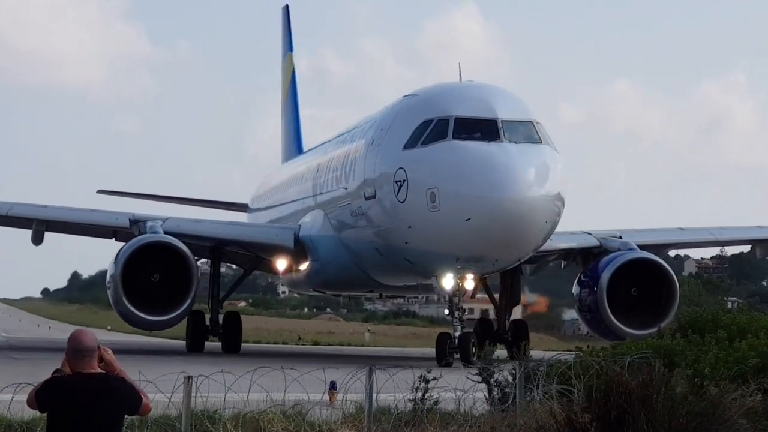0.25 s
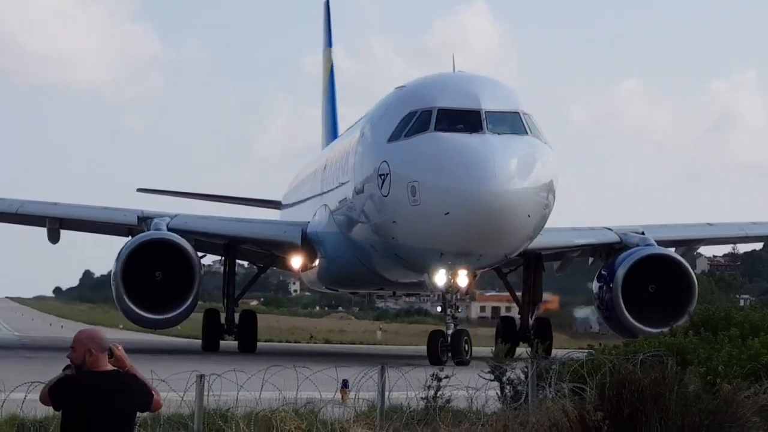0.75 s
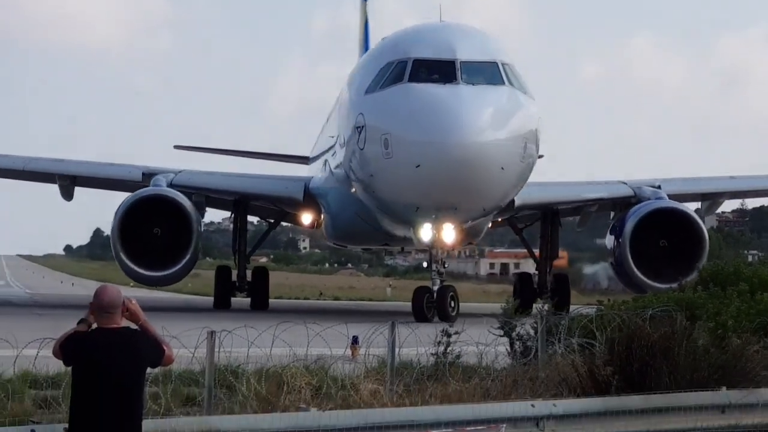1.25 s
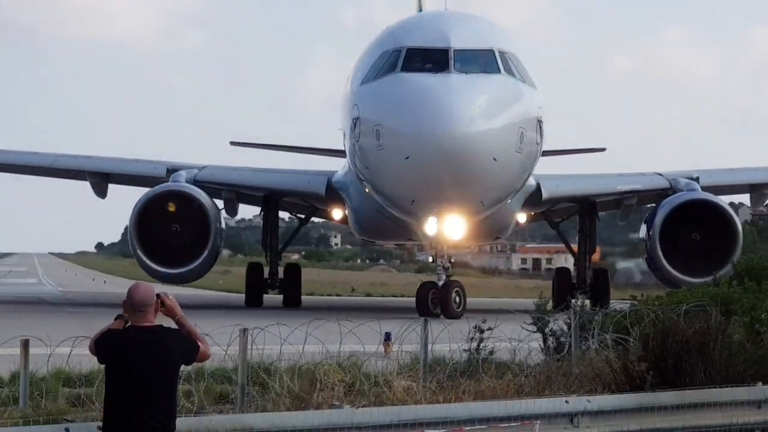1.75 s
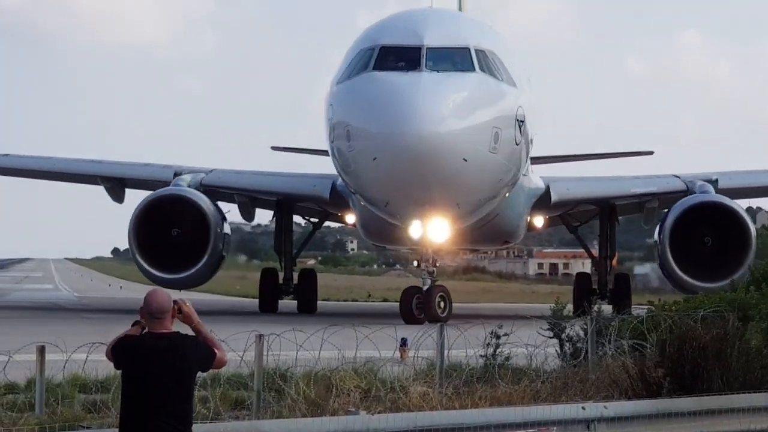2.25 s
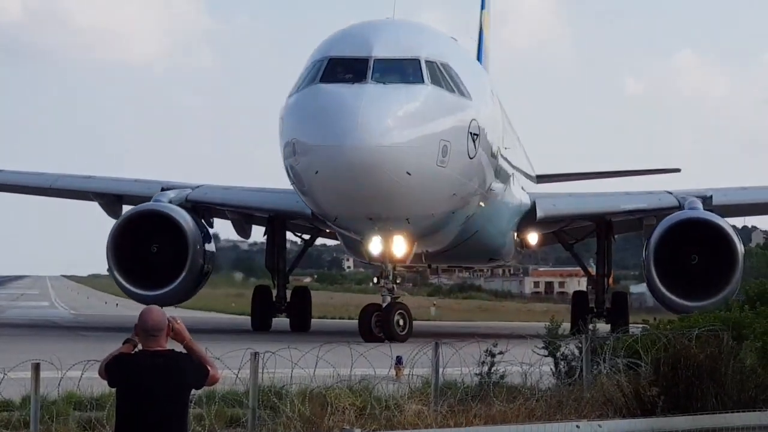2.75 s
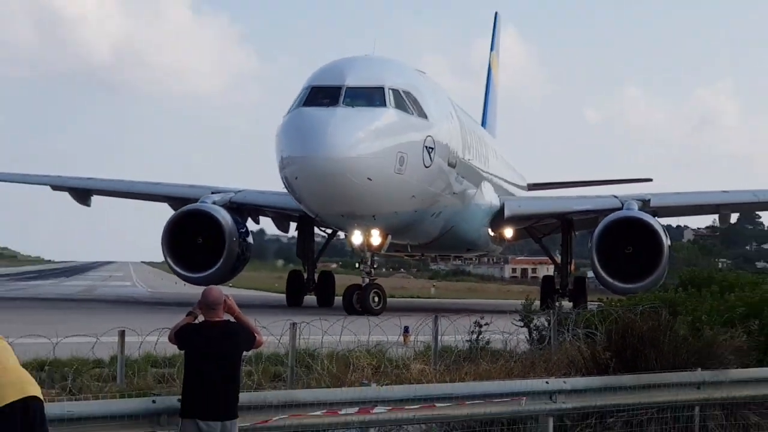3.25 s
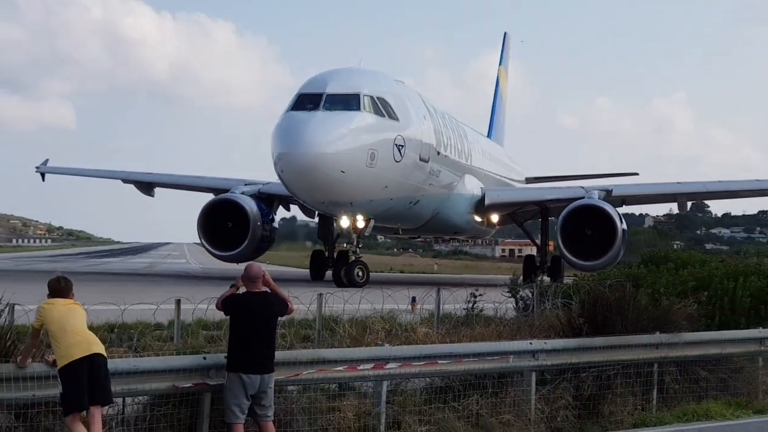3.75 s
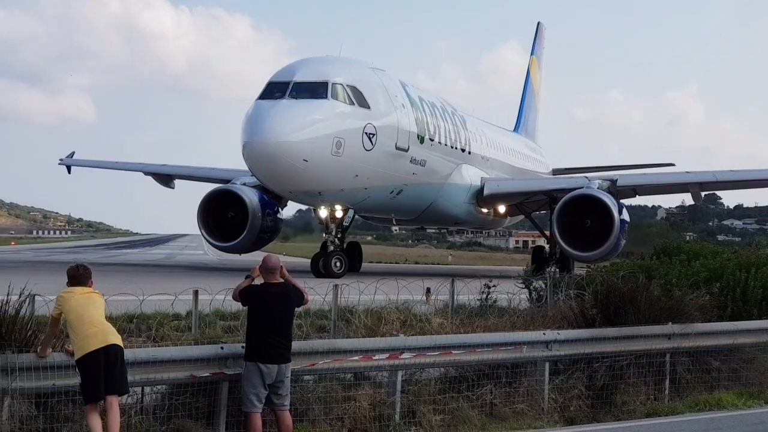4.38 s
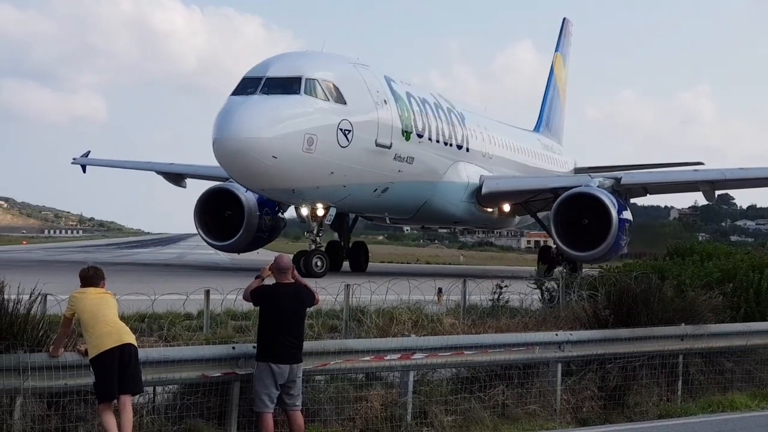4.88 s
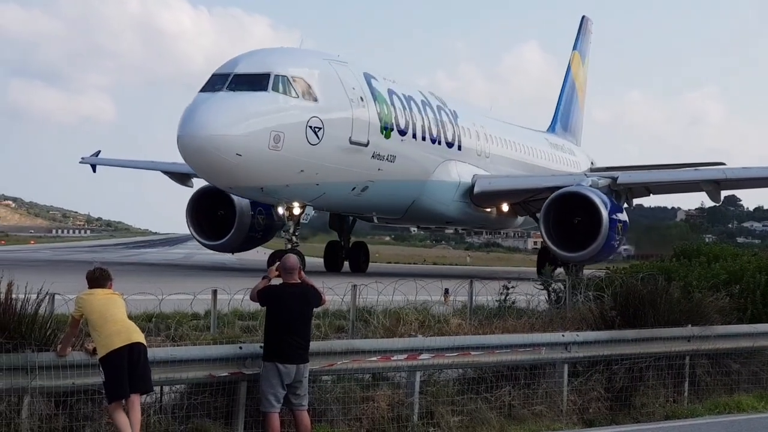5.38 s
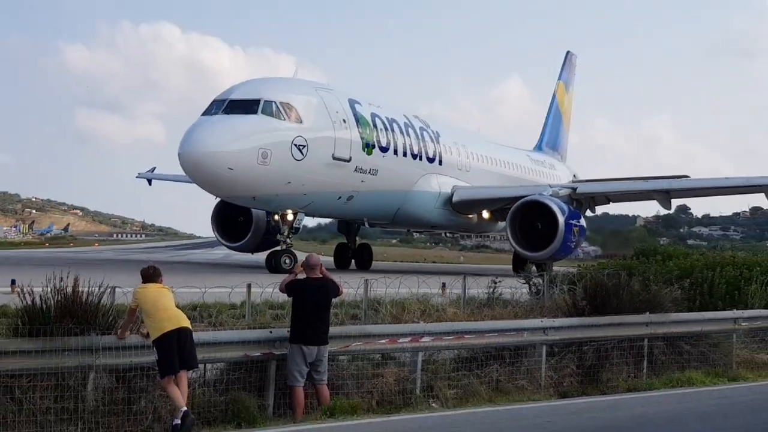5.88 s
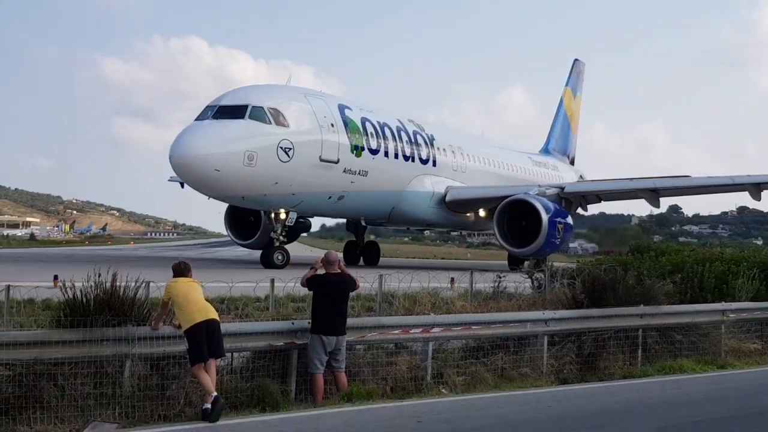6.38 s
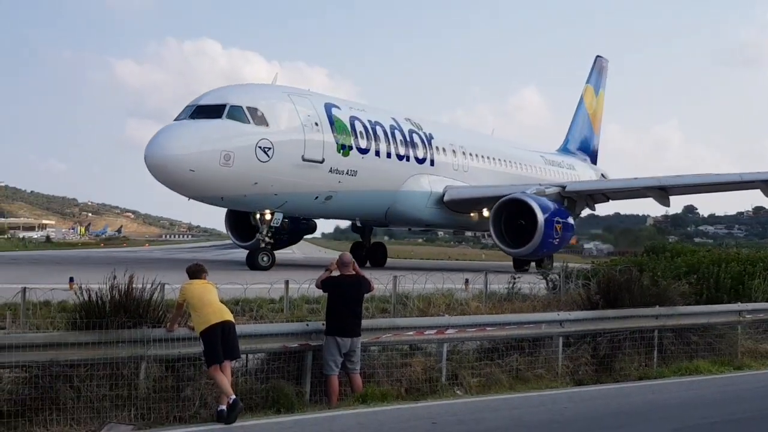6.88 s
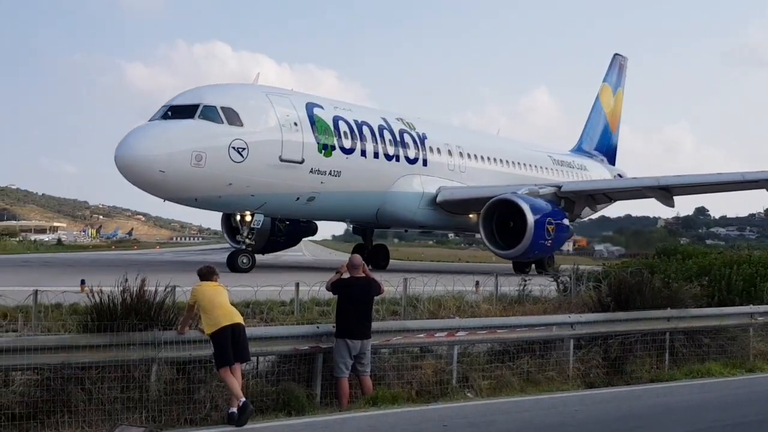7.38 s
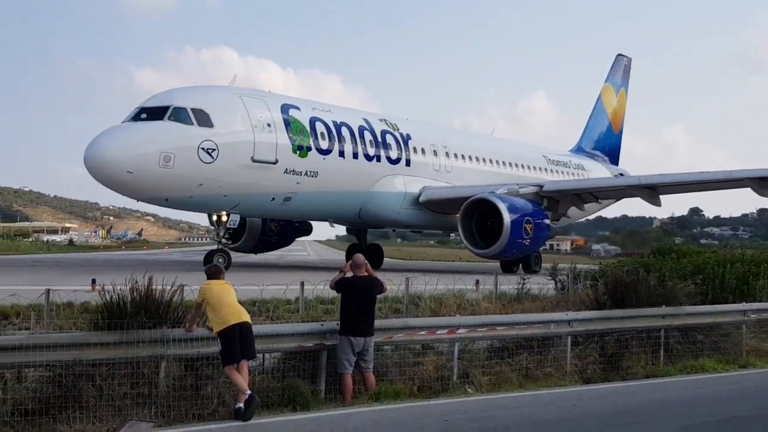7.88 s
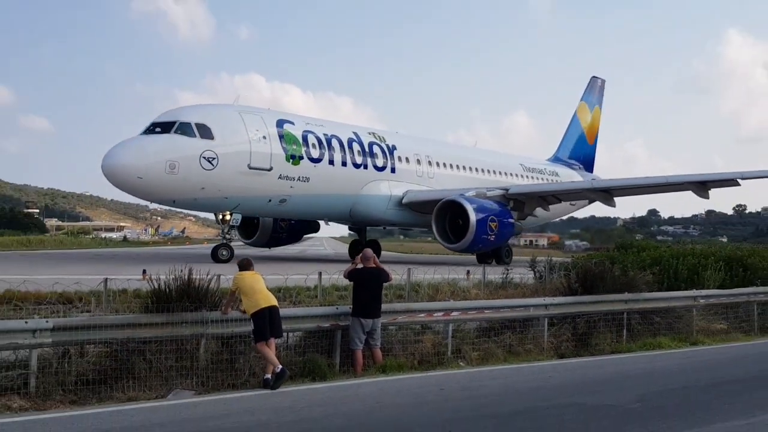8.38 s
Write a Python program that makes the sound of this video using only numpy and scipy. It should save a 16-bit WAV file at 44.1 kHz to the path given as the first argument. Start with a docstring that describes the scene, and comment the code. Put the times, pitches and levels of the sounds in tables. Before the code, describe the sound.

Outdoors near a runway fence, a twin-jet airliner taxis at low thrust: airy roar, breathy fan rush, low drone and thin high whine. At about half a second a hand bumps and cups the microphone, making a piercing, nasal blare with knocks and rubbing for a second. The engines then return quieter, swell from about three seconds and stay strong, with shifting fan tones as the plane turns.

```python
"""A twin-jet airliner taxis past at low thrust, turning from nose-on to side-on.
Rumble, roar, fan rush, hiss and fizz are shaped noise; the combustors drone on a wavering low note.
Blade whines and intake tones are sines with unsteady pitch, and lobes of fan noise sweep past.
Early on, a hand bumps the camera and cups its microphone for about a second: added bands of
noise and a lifted whine make the engines blare, over knocks and rubbing."""
import sys
import numpy as np
from scipy import signal
from scipy.fft import rfft, irfft, next_fast_len
from scipy.io import wavfile
from scipy.ndimage import uniform_filter1d, minimum_filter1d, map_coordinates

SR = 44100
rng = np.random.default_rng(int(sys.argv[2]) if len(sys.argv) > 2 else 0)


def int16_out(signal):
    """Quantize to a 16-bit WAV file."""
    q = np.round(np.clip(np.atleast_2d(signal).T, -1, 1) * 32767)
    wavfile.write(sys.argv[1], SR, q.astype(np.int16))


N = 380583  # length in samples

# How far the engines have turned. Each row: time in seconds, turn from 0 (nose-on) to 1 (side-on).
TURN = [(0, 0.053), (3.5, 0.068), (4.6, 0.42), (7, 0.46), (7.7, 0.92), (8.6, 0.94)]
# How strongly the engines carry to the camera. Each row: time in seconds, loudness in dB.
PRESENCE = [(0, -4.5), (0.35, -8), (1.5, -7), (2.25, -8.5), (2.65, -6), (3, -3.5), (3.5, -0.5), (4.4, 0),
            (4.95, 0.6), (6.2, 0), (6.8, -1), (8.63, -2)]
# How each engine layer follows the airliner. Each row: base level in dB, growth in dB per dB of
# presence, change when side-on in dB, change when nose-on in dB, change in the flare in dB.
LAYERS = { "rumble": (-30, 0.52, 3.5, -2, 0.5), "combustor": (-32, 1.15, -2.5, -1, -5),
          "roar": (-17, 1.33, 0.5, 1.5, 0), "fan": (-20.5, 0.3, -0.5, -4, 1),
          "hiss": (-27.5, 1.77, 1, 2, 5), "fizz": (-39.5, 2, -2, 0.5, 8),
          "whine": (-39.5, 1, -8.5, -4.5, 9), "intake tone": (-54, 8, -1, 2, 0), }
NOSE_ON_S, NOSE_ON_WIDTH_S = 2.47, 0.5  # the intakes point straight ahead, where the fans radiate least
FLARE_S, FLARE_WIDTH_S = 8.29, 0.17  # the treble flares once as the near intake swings past

# The colours of the noises. Each row: pitch in Hz, relative level in dB per Hz.
# low engine rumble
RUMBLE = [(15, -31), (30, -16), (45, -16.5), (75, -8), (115, -4.5), (170, 2), (250, -1), (350, -5.5),
          (450, -11), (700, -13.5)]
# exhaust roar
ROAR = [(280, -47), (420, -5.5), (520, -0.5), (750, 1), (1050, 2), (1500, 0), (1750, 0.5), (2400, -11.5)]
# fan rush from the front
FAN_FRONT = [(1300, -30), (1750, -2.5), (2050, -3), (2330, 2), (2550, -4), (2780, -3.5), (3000, -9),
             (3400, -17), (4500, -116)]
# fan rush from between front and side
FAN_QUARTER = [(1300, -23), (1750, -1.5), (2000, 4), (2330, 1), (2600, 3), (2950, 5.5), (3200, 0.5),
               (3500, -5), (4500, -52)]
# fan rush from the side
FAN_SIDE = [(1300, -23), (1750, 4), (1950, 3.5), (2330, -2.5), (2600, -6), (3100, 2.5), (3500, -44),
            (4500, -66)]
# engine hiss from the front
HISS_FRONT = [(2500, -35), (3300, 5.5), (3800, 6.5), (4200, 0.5), (4600, 1), (5500, -8), (7000, -10.5),
              (8000, -47.5)]
# engine hiss from the side
HISS_SIDE = [(2500, -28), (3300, 4.5), (3800, 8.5), (4200, 3), (4750, -2.5), (5350, 1.5), (5800, -8),
             (7000, -10), (8000, -52)]
# the highest engine noise
FIZZ = [(7000, -49), (8200, -32), (9200, -2.5), (10200, -12), (11500, 8.5), (12300, 8.5), (13200, 5.5),
        (14500, -2.5)]
# engine noise gathered in the closed hand
CUPPED = [(40, -45), (200, -32), (500, -21), (750, -10), (1000, -8), (1600, -6.5), (1940, -1.5), (2050, 4),
          (2200, 1), (2380, 2), (2550, -8), (2730, 2.5), (2980, -17), (3650, -11), (4250, -18), (5200, -52),
          (6300, -39), (8000, -71)]
# engine noise gathered in the half-open hand
HALF_OPEN = [(40, -50), (400, -27), (950, -13.5), (1650, -15.5), (2050, -3.5), (2340, 4), (2540, -9),
             (2720, -1), (3020, -16.5), (3250, -5.5), (3450, -22), (3700, -12.5), (4300, -25.5),
             (5200, -25), (7000, -63)]
# treble gathered in the hand
SIZZLE = [(3000, -15), (5000, 2), (6500, -1), (7500, -2), (8700, -18.5), (10200, -14), (12000, -4),
          (14500, -31)]
# bright roar funnelled by the opening hand
SURGE = [(1800, -18), (3200, 6), (4400, 1.5), (5300, 3), (6200, 0), (7200, -24), (9000, -46)]
# fingers rubbing on the camera shell
RUB = [(25, -24), (90, -8), (300, 1.5), (450, -2.5), (900, -8.5)]
# Fixed peaks and interference dips that colour all the shaped noise.
# Each row: pitch in Hz, width in Hz, lift in dB.
RESONANCES = [(612, 50, 4), (762, 28, -4.5), (985, 95, 6), (1255, 40, -2), (1450, 85, 5), (1660, 45, -5),
              (1900, 50, 2), (2325, 90, 3), (2485, 30, -2.5), (2770, 45, -2)]

# How alike left and right are in most of the engine noise. Each row: pitch in Hz, likeness (1 = same).
ALIKE = [(30, 0.55), (160, 1), (330, 0.81), (550, 1), (1000, 0.91), (1450, 0.84), (1680, 0.13), (1900, 0.5),
         (2300, 0.78), (3000, 0.37), (4500, 0.59), (7000, 0.11), (12000, 0.62)]
# The same for the fizz. Each row: pitch in Hz, likeness.
FIZZ_ALIKE = [(8000, .35), (13000, .45)]
# The same for noise in the hand. Each row: pitch in Hz, likeness.
HAND_ALIKE = [(200, 1), (1000, 1), (2400, 0.88), (3200, 0.5), (6000, 0.33), (12000, .45)]
# Balance of the microphone pair. Each row: pitch in Hz, left minus right in dB.
BALANCE_DB = [(600, -1.5), (1300, -0.5), (1600, -2), (2400, -5), (2900, 0.5), (4500, 2), (7000, 10.5),
              (12000, 4.5)]
# Phase difference of the microphone pair. Each row: pitch in Hz, radians by which left leads.
LEAD = [(150, 0), (750, 0.53), (950, 0.066), (1250, 0.84), (1800, 0), (2400, 0.7), (3200, 1.8), (4200, 0),
        (7000, 0.25)]
# The engine noise drifts from left toward the middle. Each row: time in seconds, left minus right in dB.
PAN = [(0, 7.5), (2.2, 2.5), (2.8, 2.5), (4.3, 1.5), (5.8, 0.5)]

DRONE_HZ, DRONE_WIDTH_HZ = 152, 15
DRONE_STEADY_DB, DRONE_OCTAVE_DB = -6, -17  # the steady core, and the octave, against the wavering note
DRONE_LULL_S, DRONE_LULL_WIDTH_S, DRONE_LULL_DB = 5.5, .4, -3  # the drone sinks as the airliner turns
# The roar's low end sinks and recovers as the airliner turns. Each row: time in seconds, change in dB.
LOW_ROAR = [(3.8, 0), (4.7, 0.5), (5.4, -2.5), (6.1, -5.5), (6.7, -2), (7.3, 0), (8.3, 3.5)]
LOW_ROAR_HZ, LOW_ROAR_WIDTH_HZ = 550, 99
PATCHY_DB, PATCH_HZ, PATCH_S = 1.45, 253.6, .12  # moving air lifts and sinks patches of the noise
# A reflection cuts evenly spaced notches, deepest while nose-on.
# Each row: time in seconds, spacing in Hz, strength in dB.
NOTCHES = [(0.3, 382, 4), (1.2, 393, 2), (2.2, 415, 2.5), (3.6, 425, 0), (8.6, 410, -0.4)]
NOTCHES_FROM_HZ, NOTCHES_TO_HZ = 950, 1750
DIP_S, DIP_WIDTH_S, DIP_DB = 6.78, 0.015, -4  # the airliner's sound dips briefly

# Compressor whines, one list for each engine, drifting apart as the airliner turns.
# Each row: time in seconds, pitch in Hz.
COMPRESSOR_HZ = ( [(0, 5788), (1.6, 5781), (3, 5786), (4.5, 5783), (6, 5779), (7.5, 5773), (8.6, 5774)],
                 [(0, 5767), (1, 5762), (2.2, 5758), (3.3, 5763), (4.6, 5759), (5.6, 5750), (8.6, 5730)], )
# The far engine's whine is hidden by the fuselage. Each row: time in seconds, share of power from 0 to 1.
FAR_SHARE = [(0, 0.4), (0.65, 0.97), (0.85, 0.6), (1.6, 0.43), (4.7, 0.16), (5.3, 0.04), (8.6, 0.5)]
# The whine swells or sinks as its lobes cross the camera.
# Each row: time in seconds, width in seconds, lift in dB.
WHINE_SWELLS = [(0.545, .035, 9), (3.25, .2, -4), (3.85, .25, 2.5), (5.2, .3, 3), (5.7, .07, -4),
                (7.2, .45, -2.5)]
WHINE_PAN_DB = 6  # left minus right, in the open air
# Intake tones, one list for each engine, sinking as the thrust is eased.
# Each row: time in seconds, pitch in Hz.
INTAKE_HZ = ( [(0, 4560), (2.6, 4535), (3.9, 4490), (5.1, 4435), (6.1, 4400), (8.6, 4375)], [(0.6, 4660),
             (1.6, 4620), (3.2, 4620), (4, 4590), (5.1, 4558), (8.6, 4460)], )
# Each intake tone beams past the camera once. Each row: start in seconds, attack in seconds,
# hold in seconds, release in dB per second, level in dB, left minus right in dB.
INTAKE_BEAMS = [(2.45, 0.5, 0.32, 16, -34.3, 13), (2.41, .05, 2.7, 5, -42.5, 2)]

GRIP_S, GRIP_ATTACK_S = 0.584, 0.043  # the hand closes fast
SLACK_S, SLACK_WIDTH_S = 1.1, 0.076  # the grip slackens for a moment
OPEN_S, OPEN_TAKES_S = 1.17, 0.28  # the hand opens gradually
# What the hollow of the hand gathers. Each row: base level in dB, extra at the first grip in dB,
# seconds in which that eases, change when slack in dB, change when open in dB,
# hold in seconds, release in dB per second.
GATHERED = { "blare": (-12.5, 2.5, 0.64, -1, -1, 0.9344, 25.5),
            "sizzle": (-27.5, -0.5, 0.7, -2.5, -6.5, 0.71, 64),
            "whine": (-33, 13, 0.38, -4.5, 2.5, 0.92, 65), "intake tone": (-46.5, 1, 2, -1, -3.5, 4, 23), }
SURGE_S, SURGE_WIDTH_S, SURGE_DB = 1.426, 0.12, -23  # the opening hand briefly funnels a bright roar
HONK_S, HONK_WIDTH_S, HONK_DB = 1.6, .07, 3.3  # the blare is lifted just as the hand lets go
# Bumps of the hand on the camera. Each row: time in seconds, knock peak in dB, pitch in Hz,
# left minus right in dB, rubbing in dB, seconds for the knock to fall by 60 dB.
BUMPS = [(0.594, -15, 235, -8.5, -28, .022), (0.732, -16, 290, -3, -26.5, .055),
         (0.847, -11.5, 365, -1, -37, .03), (0.9, -14, 390, 0.5, -23.5, .022)]
RUB_WIDTH_S = 0.013  # the fingers slide for about this long on either side of a bump

# The fan rush sputters as the intakes swing toward the camera. Each row: time in seconds, level in dB.
SPUTTERS = [(1.832, -22), (1.888, -18.5), (1.936, -15.5), (2.019, -22), (2.145, -23)]
SPUTTER_HZ, SPUTTER_WIDTH_HZ, SPUTTER_WIDTH_S = 2320, 500, .0022
# Lobes of fan noise sweep over the camera as the engines turn. Each row: start in seconds,
# attack in seconds, hold in seconds, release in dB per second (below 0 it grows), centre in Hz,
# glide in Hz per second, width in Hz, level in dB, left minus right in dB.
FAN_LOBES = [ (2.3, 0.6, 1.6, 8, 2940, -60, 222, -38, -5), (2.6, 0.45, 0.6, 22, 2290, -9.5, 258.3, -27, -1),
             (3.6, 0.46, 0.91, 5, 4385, -19.5, 481, -33, 2), (4.3, .3, 0.49, 6, 1550, 0, 150.6, -27.5, -4),
             (4.3, 0.71, 0.15, 31, 2820, 30.5, 379, -23.5, 0),
             (4.95, 0.2, 1.0, 22, 2324, 0, 240.4, -25, -12),
             (5.2, 0.37, 1.5, 16, 2956, 45, 240.8, -32.5, -11),
             (5.3, .92, 0.97, 10, 5130, -13, 262.6, -42, -11),
             (6.6, 0.34, 0.45, 14, 2720, -110, 169.6, -30, -3),
             (6.7, 0.2, 0.6, -2, 1428, -10, 79.8, -31, 0),
             (7.33, 0.14, 0.05, 20, 2430, -380, 222, -27, -10),
             (7.45, 0.3, 0.31, 20, 1910, -10, 169.3, -26.5, -2), ]
# Clean tone of a turbine stage. Each row: start in seconds, attack in seconds, hold in seconds,
# release in dB per second, pitch in Hz, glide in Hz per second, level in dB, left minus right in dB.
STAGE_TONES = [(3.8, 0.35, .6, 1.5, 6480, -4, -45, 1)]
TOP_HZ = 14600  # nothing is kept at or above this pitch


def amp(db):
    """Turn decibels into gain."""
    return 10 ** (np.asarray(db) / 20)


def unit(x):
    """Scale so that the average of the channels has rms 1."""
    middle = np.atleast_2d(x).mean(0)
    return x / np.sqrt(np.mean(middle ** 2) + 1e-20)


def along(points, hz):
    """Read a value between (Hz, value) points on a log pitch axis."""
    point_hz, value = np.transpose(points)
    return np.interp(np.log(hz + 1), np.log(point_hz + 1), value)


def curves(rows):
    """Give one value per sample for each column after the time."""
    s, *columns = np.transpose(rows)
    return [np.interp(np.arange(N) / SR, s, column) for column in columns]


def swell(centre_s, width_s):
    """A bell-shaped rise and fall with top 1."""
    return np.exp(-.5 * ((np.arange(N) / SR - centre_s) / width_s) ** 2)


def ramp(start_s, length_s):
    """A straight rise from 0 to 1."""
    return np.clip((np.arange(N) / SR - start_s) / length_s, 0, 1)


def envelope(start_s, attack_s, hold_s, release_db_per_s):
    """Gain that rises, holds and then changes steadily in dB, usually dying away."""
    released_s = np.maximum(np.arange(N) / SR - start_s - attack_s - hold_s, 0)
    return ramp(start_s, attack_s) * amp(-release_db_per_s * released_s)


def wobble(rate):
    """A smooth random curve with this many random points a second."""
    points = rng.standard_normal(int(N * rate / SR) + 4)
    return map_coordinates(points, [np.arange(N) * rate / SR])


def fast_wobble(rate, count=8192, order=8):
    """A smooth random curve for rates up to several hundred points a second."""
    smooth = signal.resample_poly(rng.standard_normal(count), order, 1)
    return np.interp(np.arange(N) * order * rate / SR, np.arange(len(smooth)), smooth)


def panned(db):
    """Left and right gains for a level difference."""
    return amp(np.array([[.5], [-.5]]) * db)


def filtered(x, response):
    """Multiply the spectrum of x by a response that depends on pitch."""
    size = next_fast_len(N + 8192)
    spectrum = rfft(x, size) * response(np.fft.rfftfreq(size, 1 / SR))
    return irfft(spectrum, size)[..., :N]


def rush(spectrum, alike):
    """Stereo turbulence: random noise shaped by a spectrum and lifted or cut at the resonances."""
    def colour(hz):
        lift = sum(db * np.exp(-.5 * ((hz - centre) / width) ** 2) for centre, width, db in RESONANCES)
        skirt = 1 / (1 + (hz / spectrum[-1][0] / 1.3) ** 6)  # fades out above the last point
        angle = np.arccos(np.clip(along(alike, hz), -1, 1)) / 2  # wider angle, less alike
        return amp(along(spectrum, hz) + lift) * skirt * np.array([np.cos(angle), np.sin(angle)])
    mid, side = filtered(rng.standard_normal((2, N)), colour)
    return unit(np.array([mid + side, mid - side]))


def morph(spectra, position, alike):
    """Noise that passes through a row of spectra as position goes from 0 to 1."""
    place = np.clip(position, 0, 1) * (len(spectra) - 1)
    out = 0
    for k, spectrum in enumerate(spectra):
        share = np.clip(1 - np.abs(place - k), 0, 1)
        out = out + np.sqrt(share) * rush(spectrum, alike)
    return out


def noise_band(hz, width_hz, pan_db, apart):
    """A sine carrier broadened by random wobbles; apart says how unlike the two ports are."""
    carrier = np.exp(2j * np.pi * np.cumsum(hz) / SR)

    def band():
        return np.real(carrier * (fast_wobble(width_hz) + 1j * fast_wobble(width_hz)))
    mid, side = band(), band()
    return unit((mid + apart * np.array([side, -side])) * panned(pan_db))


def tone(hz, drift_hz, flutter_db, pan_db):
    """A tone blurred in pitch and fading at each port as it crosses turbulent air."""
    phase = 2 * np.pi * np.cumsum(hz + drift_hz * wobble(70)) / SR
    fading_db = flutter_db * (wobble(16) + 1.1 * np.array([wobble(11), wobble(17)]))
    scatter = 0.42 * np.array([wobble(12), wobble(13)])  # radians, separate for each port
    return unit(amp(fading_db) * np.sin(phase + scatter) * panned(pan_db))


def radiated(layer):
    """Gain of one engine layer: it follows presence and changes as the engines turn."""
    db, growth, side_db, nose_db, flare_db = LAYERS[layer]
    aim_db = side_db * curves(TURN)[0] + nose_db * swell(NOSE_ON_S, NOSE_ON_WIDTH_S)
    aim_db = aim_db + flare_db * swell(FLARE_S, FLARE_WIDTH_S)
    return amp(db + growth * curves(PRESENCE)[0] + aim_db)


def gathered(layer):
    """Gain of one layer in the hollow of the hand, changing as the grip tightens, slackens and opens."""
    db, grip_db, ease_s, slack_db, open_db, hold_s, release_db_per_s = GATHERED[layer]
    tight = np.exp(-np.maximum(np.arange(N) / SR - GRIP_S, 0) / ease_s)
    level_db = db + grip_db * tight + slack_db * swell(SLACK_S, SLACK_WIDTH_S)
    level_db = level_db + open_db * ramp(OPEN_S, OPEN_TAKES_S)
    return amp(level_db) * envelope(GRIP_S, GRIP_ATTACK_S, hold_s, release_db_per_s)


def drone():
    """The combustors boom on one narrow, wavering note with a steadier core and a faint octave."""
    pitch = np.full(N, DRONE_HZ)
    note = noise_band(pitch, DRONE_WIDTH_HZ, 0, apart=0.1)
    core = tone(pitch, drift_hz=1.49, flutter_db=1.5, pan_db=-2.0)
    octave = noise_band(2 * pitch, 2 * DRONE_WIDTH_HZ, 0, apart=.3)
    return note + amp(DRONE_STEADY_DB) * core + amp(DRONE_OCTAVE_DB) * octave


def patches(x):
    """Moving air gives patches of time and pitch their own gain; a reflection adds sliding notches."""
    hz, t, z = signal.stft(x, SR, nperseg=512)
    rows, columns = np.meshgrid(hz / PATCH_HZ, t / PATCH_S, indexing="ij")
    field = map_coordinates(rng.standard_normal((256, 256)), [rows, columns], order=1)
    notch_s, *notch_columns = np.transpose(NOTCHES)
    spacing_hz, strength_db = (np.interp(t, notch_s, column) for column in notch_columns)
    notched = ((hz > NOTCHES_FROM_HZ) & (hz < NOTCHES_TO_HZ))[:, None]
    notch_db = -strength_db * notched * (.5 + np.cos(2 * np.pi * hz[:, None] / spacing_hz))
    return signal.istft(z * amp(PATCHY_DB * field + notch_db), SR, nperseg=512)[1][:, :N]


def ports(x):
    """The camera body shades and delays the sound differently at its two ports."""
    def response(hz):
        lead = np.exp(np.array([[.5j], [-.5j]]) * along(LEAD, hz))
        return panned(along(BALANCE_DB, hz)) * lead
    return filtered(x, response)


def engines():
    """Rumble, combustor drone, roar, fan rush, hiss and fizz; moving air makes their levels shimmer."""
    turn, = curves(TURN)
    air = wobble(14)  # shared by all layers but the rumble and drone
    lull = amp(DRONE_LULL_DB * swell(DRONE_LULL_S, DRONE_LULL_WIDTH_S))
    burning = radiated("rumble") * rush(RUMBLE, ALIKE) + radiated("combustor") * lull * drone()
    burning = amp(0.9 * wobble(20)) * burning
    roar = radiated("roar") * amp(0.55 * air) * rush(ROAR, ALIKE)
    low_end = filtered(roar, lambda hz: np.exp(-.5 * ((hz - LOW_ROAR_HZ) / LOW_ROAR_WIDTH_HZ) ** 2))
    roar = roar + (amp(curves(LOW_ROAR)[0] + 0.42 * wobble(14)) - 1) * low_end
    # the intake's narrow peak beams forward; from the side the fan sounds broader and lower
    fan_gain = radiated("fan") * amp(.5 * air + 0.41 * wobble(8))
    fan = fan_gain * morph([FAN_FRONT, FAN_QUARTER, FAN_SIDE], turn, ALIKE)
    hiss_gain = radiated("hiss") * amp(0.35 * air + 0.81 * wobble(28))
    hiss = hiss_gain * morph([HISS_FRONT, HISS_SIDE], turn ** 2, ALIKE)
    fizz = radiated("fizz") * amp(0.44 * air + 1.5 * wobble(33)) * rush(FIZZ, FIZZ_ALIKE)
    # as the engines move aside, their treble reaches the right port later, by up to 6 samples
    left, right = hiss + fizz
    right = map_coordinates(right, [np.arange(N) - 6 * turn], order=5, mode="nearest")
    airborne = patches(roar + fan + np.array([left, right]))
    return ports(burning + airborne) * panned(curves(PAN)[0])


def whines():
    """The two compressors run at slightly different speeds and beat; the cupped hand lifts both."""
    share = np.clip(curves(FAR_SHARE)[0], 0, 1)
    near_hz, far_hz = (curves(pitch)[0] for pitch in COMPRESSOR_HZ)
    near = np.sqrt(1 - share) * tone(near_hz, drift_hz=2.2, flutter_db=2.1, pan_db=0)
    far = np.sqrt(share) * tone(far_hz, drift_hz=3.5, flutter_db=1.6, pan_db=0)
    lobes = amp(sum(db * swell(s, width_s) for s, width_s, db in WHINE_SWELLS))
    in_air = radiated("whine") * lobes * panned(WHINE_PAN_DB) * amp(1.4 * wobble(60))
    # a second, slightly later ramp delays the whine in the closing hand
    in_hand = gathered("whine") * ramp(GRIP_S + .018, .02) * amp(1.1 * wobble(90))
    return np.hypot(in_air, in_hand) * (near + far)


def intakes():
    """Each intake sings faintly, more in the cupped hand, and clearly while its beam crosses the camera."""
    faint = np.hypot(radiated("intake tone"), gathered("intake tone"))
    out = 0
    for pitch, (*shape, db, pan_db) in zip(INTAKE_HZ, INTAKE_BEAMS):
        beam = amp(db) * envelope(*shape)
        singing = tone(curves(pitch)[0], drift_hz=6, flutter_db=1.3, pan_db=pan_db)
        out = out + np.hypot(faint, beam) * singing
    return out


def cupped_hand():
    """The hollow of the hand gathers engine noise, strongest near 2 to 2.8 kHz; it shuts fast, opens slowly."""
    hollow = morph([CUPPED, HALF_OPEN], ramp(OPEN_S, OPEN_TAKES_S), HAND_ALIKE)
    flutter_db = 1.2 * wobble(30.24) + HONK_DB * swell(HONK_S, HONK_WIDTH_S)
    blare = gathered("blare") * amp(flutter_db) * hollow
    sizzle = gathered("sizzle") * rush(SIZZLE, HAND_ALIKE)
    surge = amp(SURGE_DB) * swell(SURGE_S, SURGE_WIDTH_S) * rush(SURGE, HAND_ALIKE)
    return blare + sizzle + surge


def handling():
    """Fingers rub on the camera shell during the grip, harder around each soft, quickly fading knock."""
    rubbing = amp(-32.5) * envelope(GRIP_S, GRIP_ATTACK_S, hold_s=0.43, release_db_per_s=54)
    knocks = np.zeros((2, N))
    t = np.arange(SR // 8) / SR
    for s, db, hz, pan_db, rub_db, t60 in BUMPS:
        rubbing = rubbing + amp(rub_db) * swell(s, RUB_WIDTH_S)
        soft_start = (1 - np.exp(-t / .002)) ** 2
        knock = np.sin(2 * np.pi * hz * t) * amp(-60 * t / t60) * soft_start
        knock = knock / np.abs(knock).max()
        knocks[:, round(s * SR):][:, :len(t)] += amp(db) * knock * panned(pan_db)
    return knocks + rubbing * rush(RUB, [(100, .35), (500, 0.5)])


def sputters():
    """Very short puffs of fan noise, all cut from one band of noise."""
    gain = sum(amp(db) * swell(s, SPUTTER_WIDTH_S) for s, db in SPUTTERS)
    return gain * noise_band(np.full(N, SPUTTER_HZ), SPUTTER_WIDTH_HZ, 0, apart=.3)


def beams(rows):
    """Gain and gliding pitch of each beam in a table, followed by its other columns."""
    for start_s, attack_s, hold_s, release_db_per_s, hz, glide_hz_per_s, *rest in rows:
        gain = envelope(start_s, attack_s, hold_s, release_db_per_s)
        yield gain, hz + glide_hz_per_s * (np.arange(N) / SR - start_s), *rest


def blades():
    """Bands of fan noise and a turbine stage's clean tone come and go as gliding beams."""
    out = 0
    for gain, hz, width_hz, db, pan_db in beams(FAN_LOBES):
        out = out + amp(db) * gain * noise_band(hz, width_hz, pan_db, apart=0.35)
    for gain, hz, db, pan_db in beams(STAGE_TONES):
        out = out + amp(db) * gain * tone(hz, drift_hz=9.6, flutter_db=2.0, pan_db=pan_db)
    return out


def scene():
    """The airliner in the open air, and the hand on the camera."""
    airliner = engines() + whines() + intakes() + sputters() + blades()
    dip = amp(DIP_DB * swell(DIP_S, DIP_WIDTH_S))
    return airliner * dip + cupped_hand() + handling()


def record(dry):
    """The camera's limiter holds down the highest peaks; its band limit then removes the top."""
    needed = np.minimum(1, .98 / (np.abs(dry).max(0) + 1e-9))
    # spread each dip in gain over about 2 ms, then smooth it
    gain = uniform_filter1d(minimum_filter1d(needed, size=89), size=89)
    return filtered(dry * gain, lambda hz: hz < TOP_HZ)


dry = scene()
out = record(dry)
int16_out(out)
```